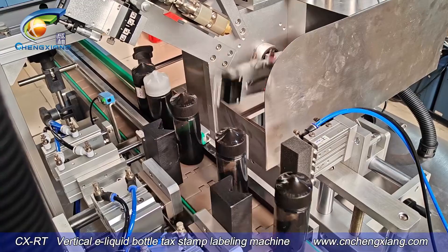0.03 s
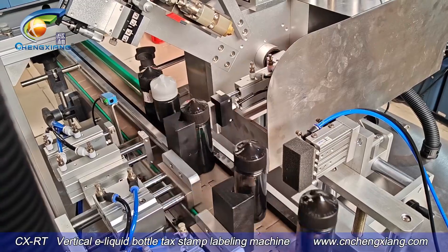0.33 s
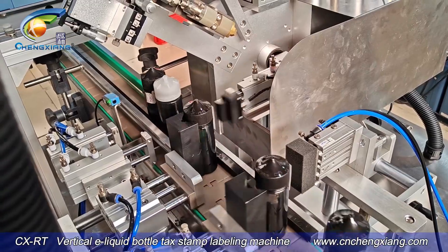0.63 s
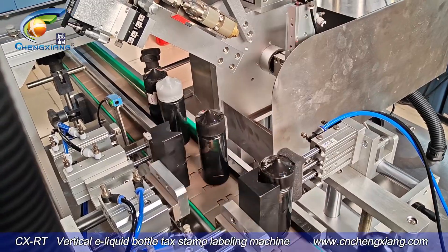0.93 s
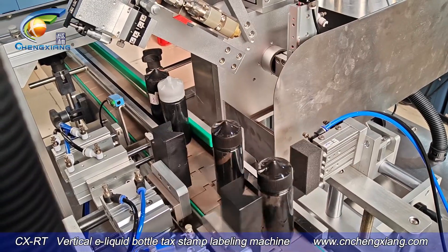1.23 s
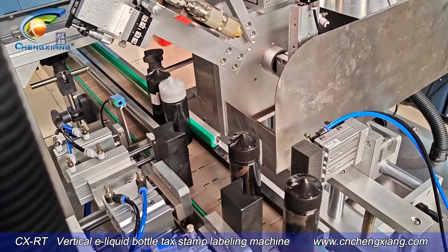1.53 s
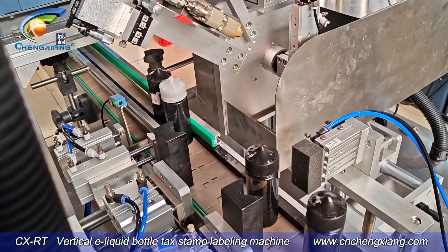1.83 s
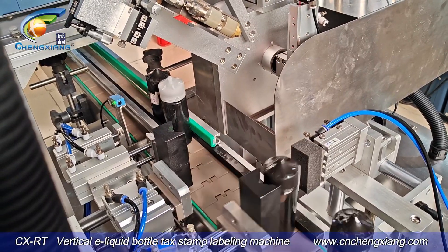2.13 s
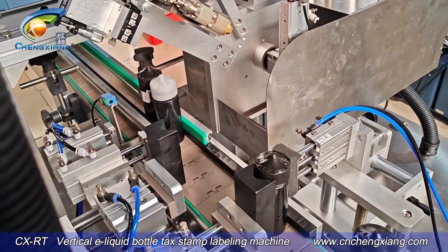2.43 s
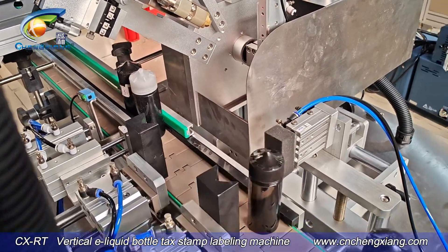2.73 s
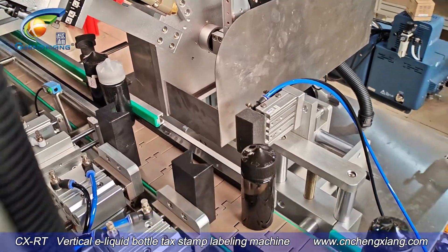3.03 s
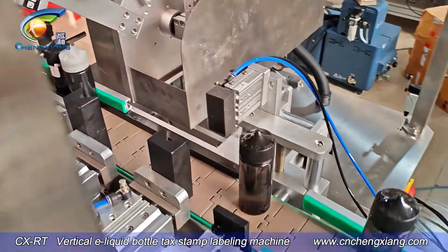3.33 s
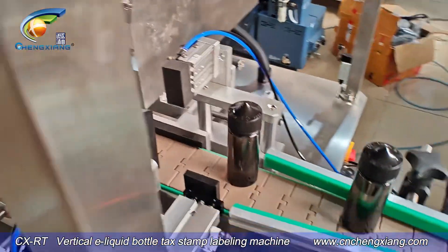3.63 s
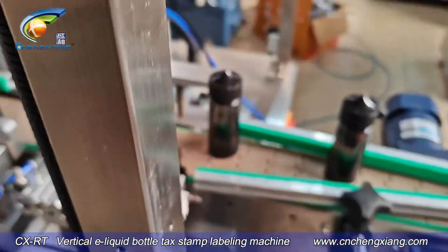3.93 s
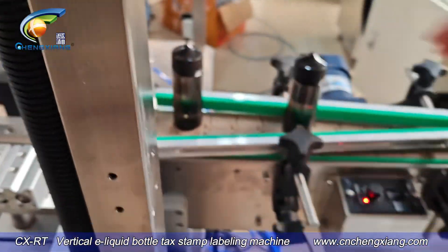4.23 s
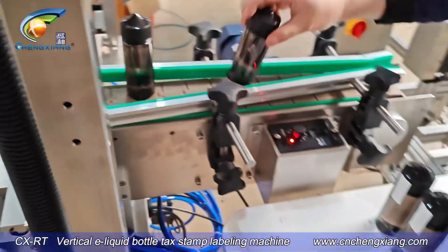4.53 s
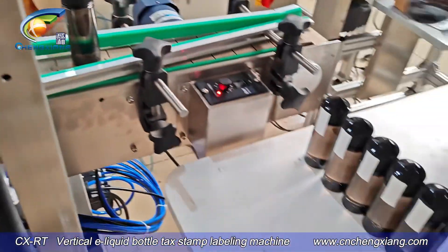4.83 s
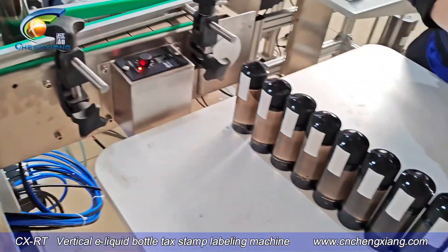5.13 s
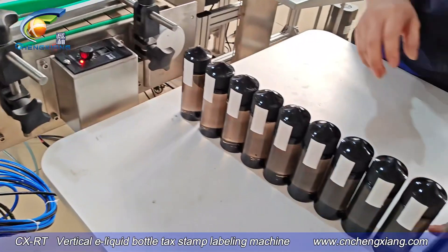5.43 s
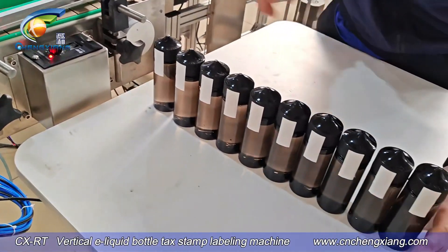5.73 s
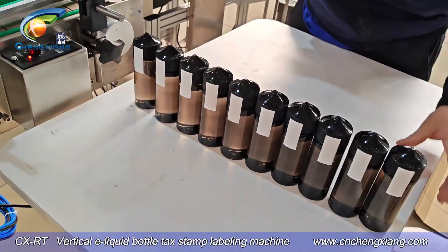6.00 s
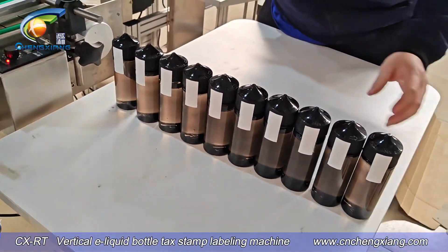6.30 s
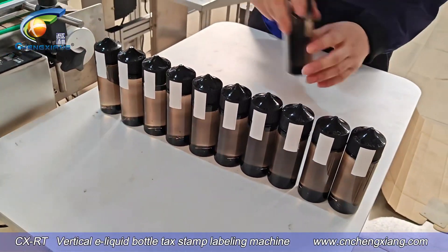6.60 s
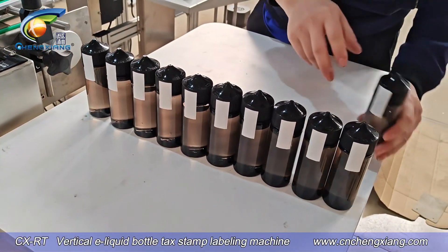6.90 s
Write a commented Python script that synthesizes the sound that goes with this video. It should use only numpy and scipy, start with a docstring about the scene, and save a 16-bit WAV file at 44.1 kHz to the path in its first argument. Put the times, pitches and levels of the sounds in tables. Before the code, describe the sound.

A pneumatic bottle labeler works close by in a slightly echoing workshop, over a continuous low conveyor hum. At first a vacuum nozzle hisses steadily while a metal arm knocks several times and shakes a droning plate. The hiss cuts off at about 0.8 seconds. Four quick strokes follow until 1.4 seconds, each with a valve click, a sharp burst of air and a metallic clack. After a short lull, four more come between 2.2 and 2.8 seconds, with brief groans of sliding parts. Then it is much quieter: motor hum, a soft chain rustle and a thin air leak, with faint clicks and groans near 3.4 and 4.7 seconds. Plastic bottles are set on a table at about 4.1 and 5.6 seconds, each with a hollow thump and a quick rocking. Light taps follow near 5.9 and 6.6 seconds, with faint microphone handling rumble.

```python
"""A pneumatic bottle labeller runs two cycles in a workshop, over a humming conveyor.
First a vacuum nozzle hisses, holding the label, while the label arm knocks and shakes its plate.
The vacuum shuts off; in each cycle of four strokes, valves click and dump air through mufflers,
cylinders hit their stops and sliding parts groan. Then the microphone moves along the conveyor
to a table, where two plastic bottles are set down and rock flat."""
import sys
import numpy as np
from scipy import signal
from scipy.fft import rfft, irfft, next_fast_len
from scipy.io import wavfile

SR = 44100
rng = np.random.default_rng(int(sys.argv[2]) if len(sys.argv) > 2 else 0)


def transcribe(u):
    """Save the signal u as a 16-bit wav file named by the first command-line argument.

    u: samples, shape (n,) or (channels, n), limited to [-1, 1]; the rate is SR.
    q: integer samples, one column per channel.
    """
    v = np.clip(np.atleast_2d(u).T, -1, 1)
    q = np.round(v * 32767).astype(np.int16)
    wavfile.write(sys.argv[1], SR, q)


N = 311346
TIME = np.arange(N) / SR

# Cylinder strokes: valve_s, move, flow_delay_s, exhaust_db, t60_s, muffler_hz, valve_db, jolt_db
STROKES = [(0.807, "grip", 0.028, -24.5, 0.21, 4430, -27, -29),
           (.936, "press", 0.016, -22, 0.16, 4970, -23.5, -34),
           (1.133, "retract", 0.018, -20, 0.12, 5080, -31.5, -46.5),
           (1.297, "release", 0.016, -22, 0.15, 4420, -33, -47),
           (2.191, "grip", .014, -22, 0.39, 4870, -34.5, -34.5),
           (2.388, "press", .013, -20, 0.22, 4550, -35, -28),
           (2.581, "retract", .021, -18.5, 0.17, 5180, -28, -30.5),
           (2.694, "release", 0.019, -18, 0.17, 4420, -26, -33)]
# Moves of a cycle: move, muffler_left_db, stop_thud_db, stop_bright_db, stop_hz
MOVES = [("grip", -1.4, 0, 3.5, 3860), ("press", -5.5, -1.4, 0.67, 4950), ("retract", 0, -12, 0.97, 4400),
         ("release", -4.2, -4.5, 7, 2520)]
# Exhaust hiss spectrum: freq_hz, level_db
EXHAUST_SPECTRUM = [(300, -18), (900, -2), (1600, -1.5), (2500, 3.5), (3400, 4.5), (5500, 9.5), (7200, 4.5),
                    (8800, 0), (11000, 1.5), (13500, -2.5), (16000, 1)]
# Muffler body spectrum: freq_hz, level_db
MUFFLER_SPECTRUM = [(1500, -40), (2100, -12), (2600, 2), (3500, -48), (4100, 3.5), (4600, 8), (5200, -1.5),
                    (5900, -28), (7500, -4), (10000, -31)]

def exhausts(opening_s=.011, choked_s=.01, linger_t60_s=.55, hiss_db=-1.05, muffler_db=3.25):
    """The first rush makes the muffler sing and its note lingers; air hisses as the cylinder empties."""
    hiss = air(EXHAUST_SPECTRUM)
    body = from_db(-7) * air(MUFFLER_SPECTRUM, offset=0)
    out = 0
    for valve_s, move, flow_delay_s, level_db, t60_s, muffler_hz, *_ in STROKES:
        peak_s = valve_s + flow_delay_s
        flow = from_db(level_db) * burst(peak_s, opening_s, t60_s)
        rush = flow / (1 + (np.maximum(TIME - peak_s, 0) / choked_s) ** 4)
        linger = from_db(level_db - 13) * burst(peak_s, opening_s, linger_t60_s)
        note = from_db(-6) * singing_noise(rush + linger, muffler_hz, width_hz=140)
        muffler = (rush + from_db(-10) * linger) * body + note
        left_db, *_ = move_settings(move)
        out += from_db(hiss_db) * flow * hiss + from_db(muffler_db) * pan(muffler, left_db)
    return from_db(drift(250)) * out


def move_settings(move):
    """A move's row, without its name."""
    return next(row[1:] for row in MOVES if row[0] == move)


# Knocks of the label arm, then of bottles on the guides: start_s, level_db, bright_db, pitch_hz
KNOCKS = [(.051, -28, -5, 4400), (.082, -23.5, 14, 3940), (.111, -28, 15.5, 7950), (.231, -23, -14.5, 4400),
          (.259, -28.5, 9, 4550), (.455, -24.5, 2.5, 4700), (.48, -24, 8, 5460), (.753, -21.5, 3, 4300),
          (1.685, -57, -1.5, 7440), (3.366, -58.5, 17.5, 5500), (4.68, -47.5, 9, 5900)]
# Pistons landing on their stops: start_s, move, level_db
LANDINGS = [(.861, "grip", -32), (.987, "press", -30.5), (1.191, "retract", -27), (1.403, "release", -29),
            (2.319, "grip", -28), (2.44, "press", -25), (2.642, "retract", -22.5), (2.803, "release", -22)]

def contacts(valve_hz=4700, valve_t60_s=.085, jolt_lead_s=.008, jolt_t60_s=.058):
    """Knocks, valve clicks, piston jolts, landings: start_s, t60_s, thud_db, clank_db, tick_db, hz."""
    rows = [blow(*knock, thud_db=-8) for knock in KNOCKS]
    for valve_s, _, flow_delay_s, *_, valve_db, jolt_db in STROKES:
        jolt_s = valve_s + flow_delay_s - jolt_lead_s
        rows.append((valve_s, valve_t60_s, valve_db - 4, valve_db - 15.5, valve_db, valve_hz))
        rows.append((jolt_s, jolt_t60_s, jolt_db - 5, jolt_db, jolt_db + 1, valve_hz))
    for start_s, move, level_db in LANDINGS:
        _, thud_db, bright_db, stop_hz = move_settings(move)
        rows.append(blow(start_s, level_db, bright_db, stop_hz, thud_db))
    return rows


def blow(start_s, level_db, bright_db, pitch_hz, thud_db, halvings_per_db=.27):
    """One contact row; a brighter knock is harder and rattles for less time."""
    t60_s = .083 / 2 ** (halvings_per_db * max(bright_db, 0))
    return start_s, t60_s, level_db + thud_db, level_db, level_db + bright_db, pitch_hz


# Stop bracket modes: freq_hz, level_db, t60_s
BRACKET_MODES = [(811, -10, 0.08), (900.5, -1, 0.058), (1068, -16, 0.058)]
# Bracket rattle spectrum: freq_hz, level_db
CLANK_SPECTRUM = [(250, -36), (500, -2), (760, 5), (900, -2), (1100, 8.5), (1400, 0.5), (1900, -2),
                  (2650, -2.5), (4000, -10)]
# Frame thud spectrum: freq_hz, level_db
THUD_SPECTRUM = [(90, -18), (135, 2.5), (200, -2), (330, -2.5), (550, -7.5), (1000, -8)]
# Spectrum of the frame's late bending waves: freq_hz, level_db
BOOM_SPECTRUM = [(45, -28), (65, -0.5), (110, -0.5), (170, 2.5), (300, -10)]
# Metal tick spectrum: freq_hz, level_db
TICK_SPECTRUM = [(1000, -18), (2000, -5), (2700, 7.5), (3400, -2.5), (4600, 9.5), (6000, 3.5), (7500, 2),
                 (9000, -7), (12000, -21), (16000, -22)]
# Spectrum of loose guides and covers: freq_hz, level_db
SHUDDER_SPECTRUM = [(70, -3), (200, 6.5), (500, -4.5), (1400, -16), (2600, -14), (5000, -9)]

def knocks(rise_s=.0016, boom_lag_s=.028, shudder_t60_s=.39):
    """Each contact ticks and clinks, rings the bracket, thuds through the frame and shakes the covers."""
    thud = boom_power = clank = tick = snap = clink = 0
    impulses = np.zeros(N)
    for start_s, t60_s, thud_db, clank_db, tick_db, pitch_hz in contacts():
        contact = from_db(tick_db) * burst(start_s + rise_s, rise_s, t60_s)
        tick += contact
        snap += contact * (pitch_hz / 4700) ** 2   # small parts snap brightest
        clink += singing_noise(contact, pitch_hz, width_hz=380)
        swell_s = rise_s * from_db(max(clank_db - tick_db, 0))   # soft contacts build slowly
        clank += from_db(clank_db) * burst(start_s + swell_s, swell_s, .87 * t60_s)
        thud += from_db(thud_db) * burst(start_s + rise_s, 2 * rise_s, t60_s=.12)
        boom_power += (from_db(thud_db) * burst(start_s + boom_lag_s, boom_lag_s, t60_s=.41)) ** 2
        impulses[round((start_s + swell_s) * SR)] += from_db(clank_db)
    bracket = .8 * clank * air(CLANK_SPECTRUM) + ring_modes(impulses, BRACKET_MODES)
    frame = thud * air(THUD_SPECTRUM) + from_db(-8) * np.sqrt(boom_power) * air(BOOM_SPECTRUM)
    metal = tick * air(TICK_SPECTRUM) + from_db(-6) * pan(clink, left_db=-6)
    metal += from_db(-7) * snap * air([(7000, -4), (11000, 1.5), (16000, -6)])
    energy_decay = np.exp(-2 * np.log(1000) / (shudder_t60_s * SR))
    stored_energy = signal.lfilter([1], [1, -energy_decay], impulses ** 2 + 1e-18)
    shudder = from_db(-15) * np.sqrt(stored_energy) * air(SHUDDER_SPECTRUM)
    return frame + bracket + metal + shudder


# Vacuum jet spectrum: freq_hz, level_db
JET_SPECTRUM = [(240, -53), (400, -41.5), (814, -13), (1270, -31), (1700, -16.5), (2080, -22), (2320, -8),
                (3020, -4.5), (3750, -7), (4730, -2.5), (5780, -7.5), (7750, -10.5), (8630, -15),
                (11600, -5.5), (16000, -10)]
# Nozzle resonances: freq_hz, width_hz, lift_db
NOZZLE_RESONANCES = [(3050, 105, 7), (4400, 450, 3), (11480, 150, 10)]

def vacuum(level_db=-24, shut_s=.762, shut_t60_s=.11, dip_s=.118, dip_width_s=.022):
    """A jet, coloured by the nozzle, hisses until its valve shuts; the level dips briefly once."""
    dip_db = -9 * np.exp(-((TIME - dip_s) / dip_width_s) ** 2)
    flow = from_db(level_db + dip_db + .5 * drift(91)) * decay(shut_s, shut_t60_s)
    return flow * air(JET_SPECTRUM, NOZZLE_RESONANCES)


# Bottles set down: start_s, thump_db, contact_s, click_db, first_gap_s
BOTTLES = [(4.0801, 3.5, 0.0032, -2, .0177), (5.615, -2.5, 0.00084, -1.5, 0.016)]

def touches(gap_ratio=1.57, contact_ratio=.61, thump_loss_db=9, click_loss_db=15):
    """A bottle rocks on its rim: gaps widen, contacts shorten, blows weaken."""
    for start_s, thump_db, contact_s, click_db, first_gap_s in BOTTLES:
        for k in range(3):
            yield (start_s, thump_db - k * thump_loss_db,
                   contact_s * contact_ratio ** k, click_db - k * click_loss_db)
            start_s += first_gap_s * gap_ratio ** k


# Light taps on a shell: start_s, click_db
SHELL_TAPS = [(4.178, -12.5), (5.9, -17.5), (6.56, -19)]
# Modes of the loaded table top: freq_hz, level_db, t60_s
TABLE_MODES = [(160, -35, 0.13), (187, -25, .1), (246, -24.5, 0.1), (284, -34, 0.1), (341.6, -5.5, 0.11),
               (407, -26, 0.083), (473.4, -16.5, 0.18), (570, -14, 0.088), (680, -29, 0.12),
               (1014, -26.5, 0.051)]
# Plastic shell modes: freq_hz, level_db, t60_s
SHELL_MODES = [(1610, -60, 0.063), (1865, -38, .13), (1926, -36.5, .075), (2286, -40.5, 0.05),
               (3070, -31, .035), (3210, -43, 0.041), (3970, -54, .05), (4700, -39.5, 0.057)]
# Bottle scuff spectrum: freq_hz, level_db
SCUFF_SPECTRUM = [(170, 3.5), (330, 5), (600, -3.5), (850, -14.5), (1400, -21.5), (3000, -25),
                  (5000, -25.5), (9000, -44), (16000, -68)]

def bottles(radiation_hz=195, scuff_db=-27):
    """Each touch thumps the table, clicks the shell and scuffs; the small top radiates little bass."""
    force, clicks, scuff = np.zeros((3, N))
    for start_s, click_db in SHELL_TAPS:
        clicks[round(start_s * SR)] = from_db(click_db)
    for start_s, thump_db, contact_s, click_db in touches():
        age = np.clip((TIME - start_s) / contact_s, 0, 20)
        push = age * np.exp(-2 * np.pi * age)
        force += from_db(thump_db) * push / push.sum()
        clicks[round(start_s * SR)] = from_db(click_db)
        scuff += from_db(thump_db) * burst(start_s + contact_s, 4 * contact_s, t60_s=.32)
    bass_cut = signal.butter(3, radiation_hz, "high", fs=SR, output="sos")
    top = signal.sosfilt(bass_cut, ring_modes(force, TABLE_MODES))
    shell = 0
    for hz, level_db, t60_s in SHELL_MODES:
        uneven_clicks = clicks * from_db(2 * drift(200))
        shell += from_db(level_db) * ring(uneven_clicks, hz, t60_s)
    return top + shell + from_db(scuff_db) * scuff * air(SCUFF_SPECTRUM)


# Sliding parts: start_s, length_s, start_hz, end_hz, level_db, t60_s
SLIDES = [(0.739, .04, 270, 276, -24.5, 0.069), (2.292, 0.056, 647, 172, -32.5, 0.48),
          (2.72, .055, 253, 494, -21.5, 0.15), (3.367, 0.059, 256, 276, -39, 0.22),
          (4.689, 0.032, 243, 292, -34, 0.091)]

def groans(rise_s=.0038, scrape_db=-7):
    """Uneven stick-slip cycles glide in pitch as a part slides and scrapes."""
    waver = 1 + .08 * drift(180)
    grip = from_db(3.5 * drift(130))
    scrape = from_db(scrape_db) * air([(200, 4), (350, 5.5), (700, -2.5), (1400, -10.5)])
    out = 0
    for start_s, length_s, start_hz, end_hz, level_db, t60_s in SLIDES:
        travel = np.clip((TIME - start_s) / length_s, 0, 1)
        glide_hz = end_hz + (start_hz - end_hz) * (1 - travel) ** 2
        slips = tone(glide_hz * (TIME > start_s) * waver)
        envelope = burst(start_s + rise_s, rise_s, t60_s) * np.sqrt(1 - travel ** 2)
        out += from_db(level_db) * envelope * (slips + scrape)
    return grip * out


# Label arm jerks: peak_s, level_db, t60_s
ARM_JERKS = [(0.059, -29.5, .2), (0.183, -25, 0.32), (.35, -36.5, 0.29), (.5, -38, .25), (.89, -34, 1.18)]

def arm_plate(pitch_hz=186, swell_s=.065):
    """The mounting plate drones at an unsteady pitch, swelling with each jerk of the arm."""
    shake = sum(from_db(level_db) * burst(peak_s, swell_s, t60_s)
                for peak_s, level_db, t60_s in ARM_JERKS)
    drone = tone(pitch_hz * (1 + .0434 * drift(40.1)))
    return shake * from_db(1.1 * drift(41)) * drone


# Levels on the way from labeller to table: time_s, motor_db (before trim), chain_db, leak_db
CONVEYOR_LEVELS = [(2, -52.5, -61, -56.5), (3.2, -49.5, -61, -53.5), (3.8, -48.5, -56.5, -51),
                   (4.4, -49.5, -57.5, -57.5), (5, -47.5, -53.5, -58.5), (7.06, -48.5, -55.5, -65.5)]
# Motor hum, relative to the rumble: pitch_hz, level_db
HUM_TONES = [(97, -19), (194, -16), (288, -16), (365, -17.5)]
# Motor rumble spectrum: freq_hz, level_db
RUMBLE_SPECTRUM = [(15, -40), (25, -26), (64, -8), (96, -0.5), (124, -8.5), (202, -2.5), (243, -9),
                   (287, -8.5), (416, -12), (501, -12), (690, -13.5), (751, -17), (1400, -16), (1820, -49),
                   (3080, -120)]
# Slat chain spectrum: freq_hz, level_db
CHAIN_SPECTRUM = [(500, -1.5), (1100, -19.5), (1600, -1.5), (2500, 3), (3500, -3), (5000, -9), (8000, -6.5),
                  (9500, -20)]
# Air leak spectrum: freq_hz, level_db
LEAK_SPECTRUM = [(2500, -28), (4500, 5.5), (6000, -2), (8000, -2.5), (9300, -7.5), (12000, -4), (14500, 2),
                 (16000, 5)]

def conveyor(motor_trim_db=-3.5, hum_waver_db=4):
    """Motors rumble and hum, the slat chain rustles, air leaks from the fittings."""
    motor_db, chain_db, leak_db = in_time(CONVEYOR_LEVELS)
    hum = 0
    for pitch_hz, level_db in HUM_TONES:
        gain = from_db(level_db + hum_waver_db * drift(6.3))
        hum += gain * tone(pitch_hz * (1 + .0186 * drift(14)))
    rumble = air(RUMBLE_SPECTRUM) * from_db(drift(19))
    motors = from_db(motor_db + motor_trim_db) * (rumble + hum)
    chain = from_db(chain_db + 1.6 * drift(45)) * air(CHAIN_SPECTRUM)
    return motors + chain + from_db(leak_db) * air(LEAK_SPECTRUM)


# Hand rumble: time_s, level_db
HANDLING_LEVELS = [(1.8, -84), (2.7, -59), (5.9, -62), (6.3, -51.5), (7.06, -57.5)]

def handling():
    """Deep rumble from the hand carrying the microphone."""
    level_db, = in_time(HANDLING_LEVELS)
    return from_db(level_db) * air([(22, -17), (42, -5), (65, -13), (100, -1.5)])


# Reverberation bands: centre_hz, level_db, t60_s
HALL_BANDS = [(60, -13, 0.88), (196, -8.5, 0.74), (450, -4, 0.5), (930, -8, 0.45), (1490, -7, 0.83),
              (2460, -4.5, 0.48), (4700, -8.5, .57), (7100, -12, 0.37), (10000, -18, 0.36),
              (16100, -28, .2)]

def hall(x, build_up_s=.0025):
    """Diffuse reflections build up briefly and die at their own pace in each band."""
    t, hz = TIME[:SR], np.arange(SR // 2 + 1)
    noise, response = stereo_noise(hz, SR), 0
    for centre_hz, level_db, t60_s in HALL_BANDS:
        band = at_hz([(row[0], row[0] == centre_hz) for row in HALL_BANDS], hz)
        fade = np.exp(-np.log(1000) * t / t60_s) * (1 - np.exp(-t / build_up_s))
        response += from_db(level_db) * irfft(noise * band, SR) * fade / np.linalg.norm(fade)
    return signal.fftconvolve(x, response, axes=1)[:, :N]


# Left-right balance, machine on the right: freq_hz, left_db
BALANCE = [(400, 0), (900, -1.6), (2500, -2), (5000, -1.5), (7000, 0.5), (9500, -2), (11500, -5.5),
           (14000, -4)]

def air(spectrum, resonances=(), offset=1):
    """Stereo noise, rms 1, shaped by (freq_hz, level_db) points; offset 0 is straight ahead."""
    size = next_fast_len(N)
    hz = np.arange(size // 2 + 1) * SR / size + 1e-3
    past_ends = np.maximum(np.maximum(spectrum[0][0] / hz, hz / spectrum[-1][0]), 1)
    peaks_db = sum(lift_db / (1 + (2 * (hz - centre_hz) / width_hz) ** 2)
                   for centre_hz, width_hz, lift_db in resonances)
    gain = from_db(at_hz(spectrum, hz) + peaks_db) / past_ends ** 2
    white = pan(stereo_noise(hz, size), offset * at_hz(BALANCE, hz))
    noise = irfft(white * gain, size)[:, :N]
    return noise / np.sqrt(np.mean(noise ** 2) + 1e-20)


# Left-right likeness of diffuse sound: freq_hz, correlation
LIKENESS = [(60, 0.97), (200, 0.99), (400, 0.78), (700, 0.77), (1300, -0.23), (2500, -0.014),
            (16000, -0.053)]

def stereo_noise(hz, size):
    """White noise spectra for two channels: alike in the bass, unrelated in the treble."""
    alike = np.clip(at_hz(LIKENESS, hz), -1, 1)
    mid, side = rfft(rng.standard_normal((2, size)))
    return (np.sqrt(1 + alike) * mid + np.sqrt(1 - alike) * side * [[1], [-1]]) / np.sqrt(2)


def singing_noise(envelope, hz, width_hz):
    """A resonance driven by turbulence or rattling; its rms follows the envelope."""
    active = envelope > envelope.max() / 1000
    drive = np.zeros((2, N))
    drive[:, active] = envelope[active] * rng.standard_normal((2, active.sum()))
    resonance = signal.iirpeak(hz, hz / width_hz, fs=SR)
    return signal.lfilter(*resonance, drive + 1e-18) * np.sqrt(SR / (np.pi * width_hz))


def ring(force, hz, t60_s):
    """One mode: a unit impulse starts a decaying sine of height 1."""
    radius, angle = np.exp(-np.log(1000) / (t60_s * SR)), 2 * np.pi * hz / SR
    return signal.lfilter([0, np.sin(angle)], [1, -2 * radius * np.cos(angle), radius ** 2], force + 1e-18)


def ring_modes(force, modes):
    """Sum of modes driven by one force."""
    return sum(from_db(level_db) * ring(force, hz, t60_s) for hz, level_db, t60_s in modes)


def tone(hz):
    """Sine of rms 1 following a pitch curve."""
    return np.sqrt(2) * np.sin(2 * np.pi * np.cumsum(hz) / SR)


def burst(peak_s, rise_s, t60_s):
    """Envelope that swells to 1, then decays."""
    return np.clip(1 + (TIME - peak_s) / rise_s, 0, 1) ** 2 * decay(peak_s, t60_s)


def decay(start_s, t60_s):
    """Envelope that holds at 1, then falls exponentially."""
    return np.exp(-np.log(1000) * np.clip((TIME - start_s) / t60_s, 0, 2))


def drift(rate_hz):
    """Random wander between knots of spread 1."""
    knots = rng.standard_normal(4000)
    return np.interp(TIME * rate_hz, np.arange(len(knots)), knots)


def in_time(rows):
    """Each column of a timed curve, at every sample."""
    times_s, *columns = np.transpose(rows)
    return [np.interp(TIME, times_s, column) for column in columns]


def at_hz(points, hz):
    """Read a curve on a log-frequency axis."""
    freqs_hz, values = np.transpose(points)
    return np.interp(np.log(hz + 1), np.log(freqs_hz), values)


def pan(x, left_db):
    """Set the left channel left_db above the right."""
    return x * from_db(left_db * np.array([[.5], [-.5]]))


def from_db(db):
    """Decibels to gain."""
    return 10 ** (np.asarray(db) / 20)


def scene():
    """Machine, nozzle and table sound into the hall; plate, conveyor and handling stay dry."""
    machine = exhausts() + knocks() + groans()
    nozzle, table = vacuum(), bottles()
    reflections = hall(machine + from_db(-13) * nozzle + from_db(-3) * table)
    return machine + nozzle + arm_plate() + table + reflections + conveyor() + handling()


def record(dry):
    """Steep low-pass at 15.9 kHz."""
    return signal.sosfilt(signal.ellip(12, .1, 80, 15900, fs=SR, output="sos"), dry)


dry = scene()
out = record(dry)
transcribe(out)
```